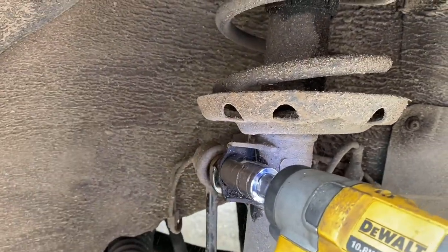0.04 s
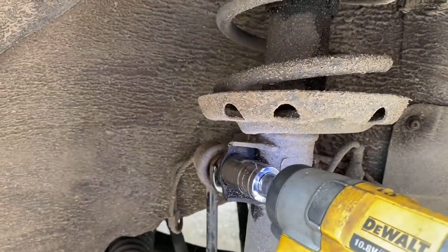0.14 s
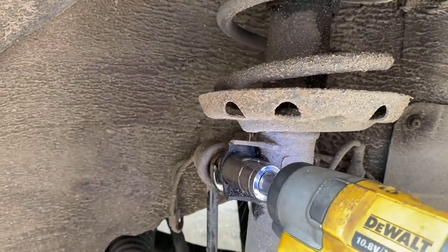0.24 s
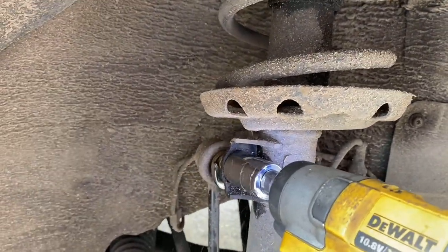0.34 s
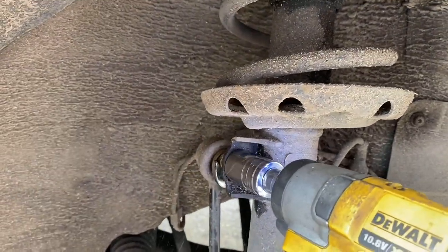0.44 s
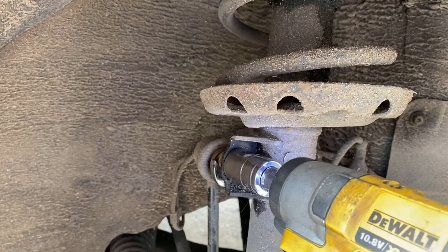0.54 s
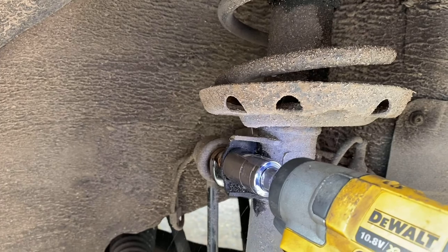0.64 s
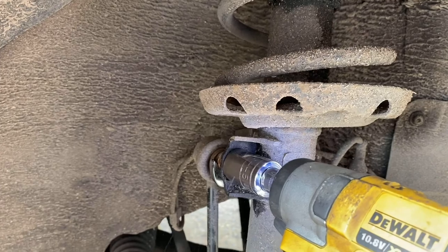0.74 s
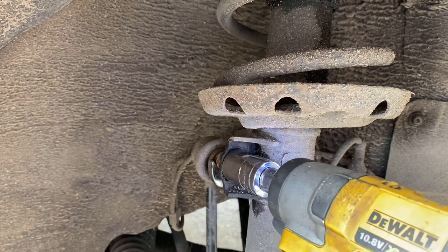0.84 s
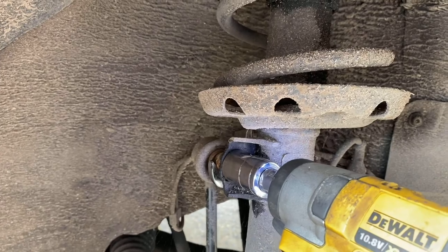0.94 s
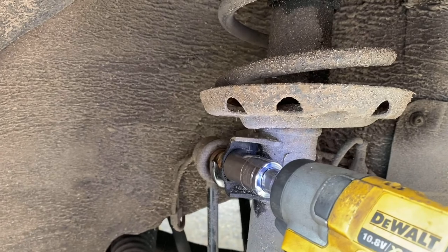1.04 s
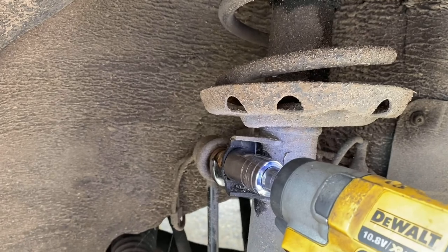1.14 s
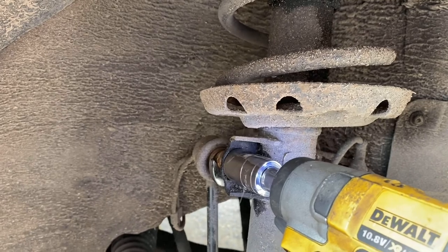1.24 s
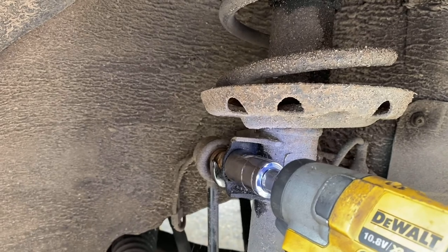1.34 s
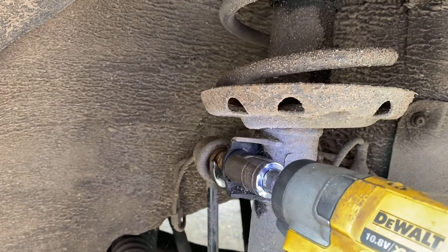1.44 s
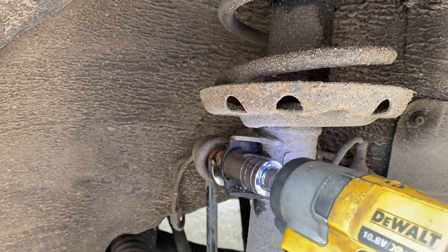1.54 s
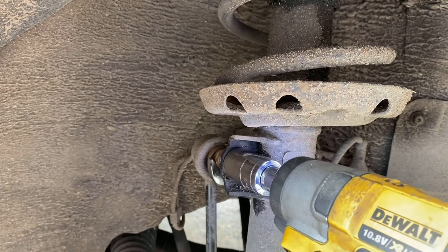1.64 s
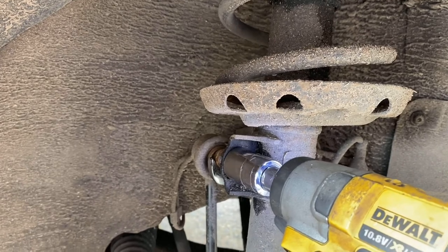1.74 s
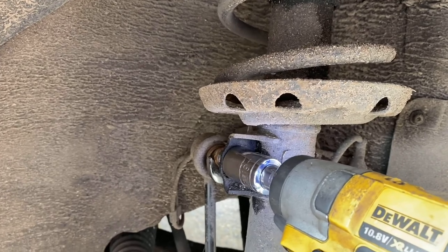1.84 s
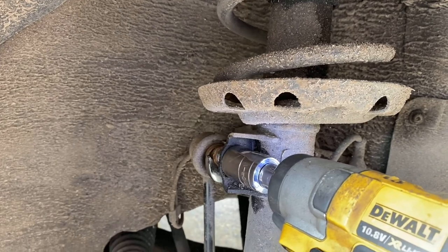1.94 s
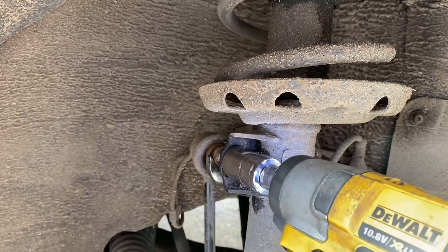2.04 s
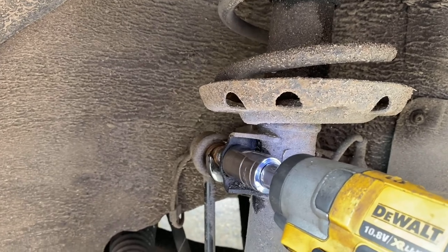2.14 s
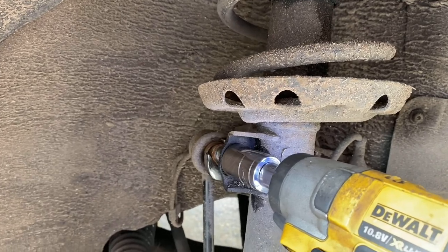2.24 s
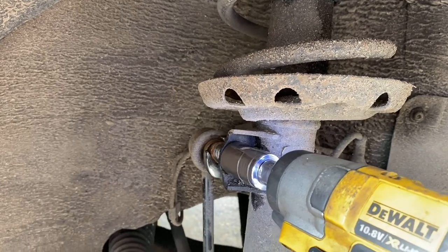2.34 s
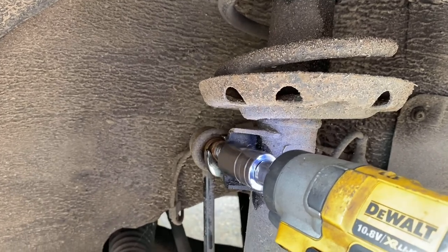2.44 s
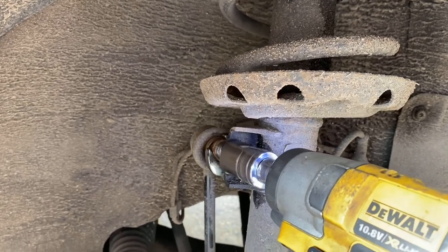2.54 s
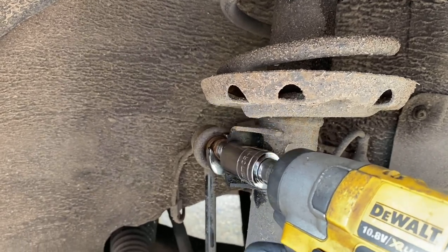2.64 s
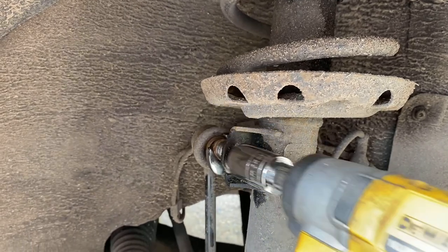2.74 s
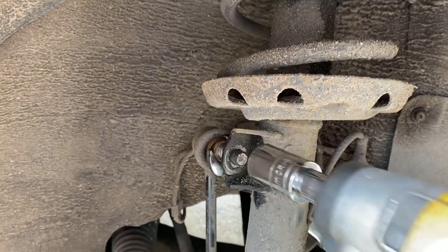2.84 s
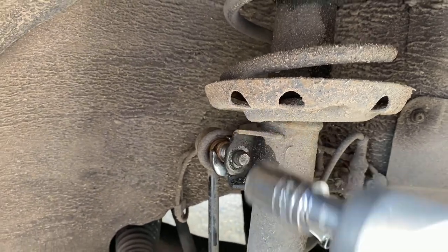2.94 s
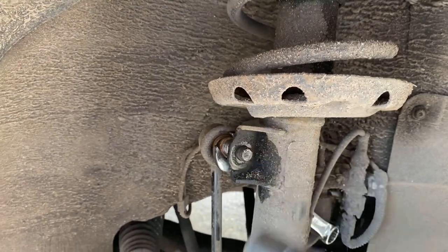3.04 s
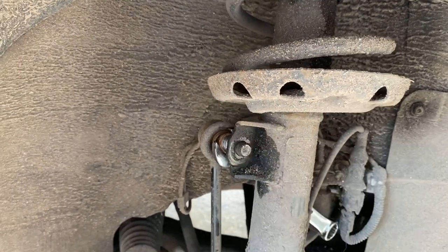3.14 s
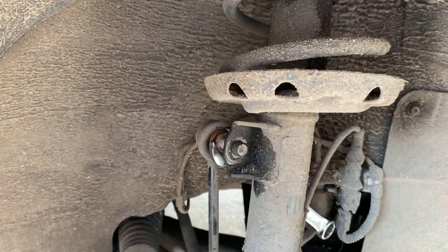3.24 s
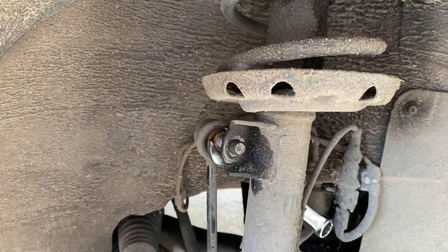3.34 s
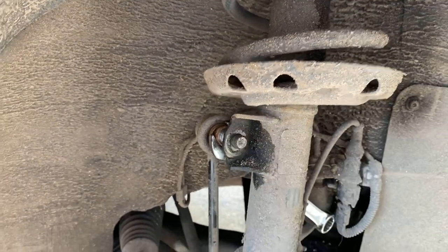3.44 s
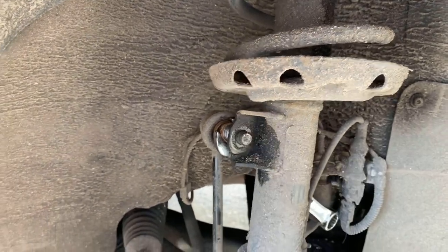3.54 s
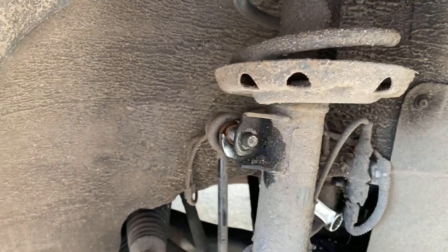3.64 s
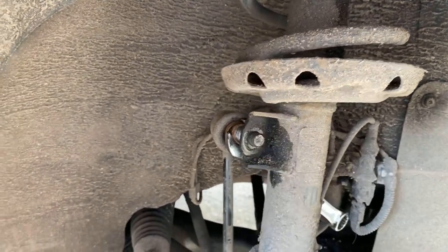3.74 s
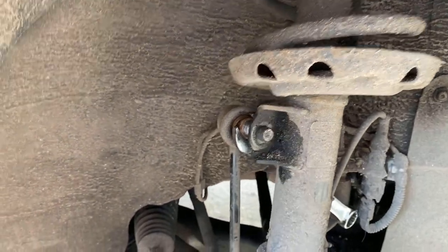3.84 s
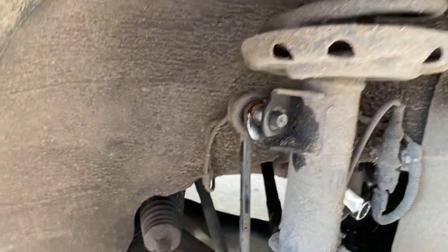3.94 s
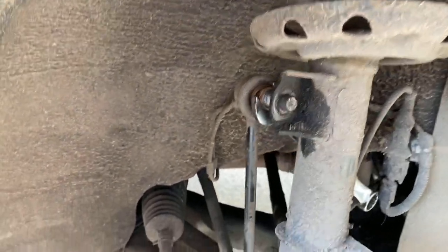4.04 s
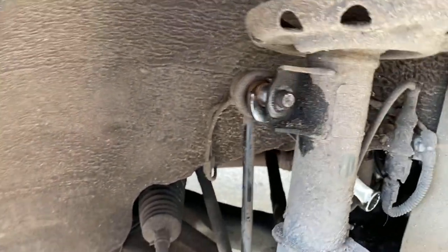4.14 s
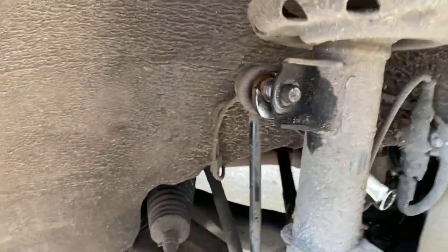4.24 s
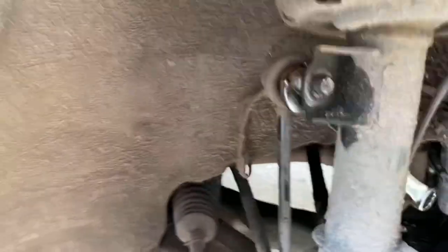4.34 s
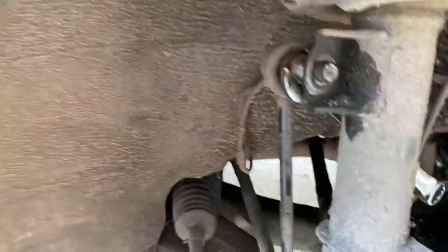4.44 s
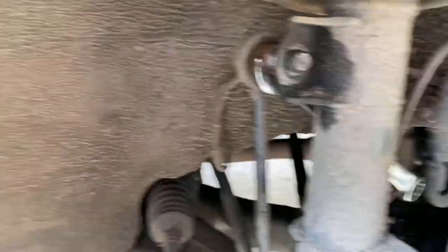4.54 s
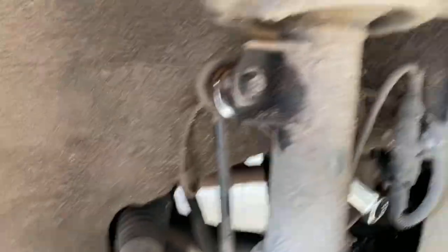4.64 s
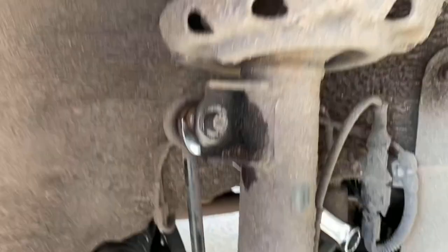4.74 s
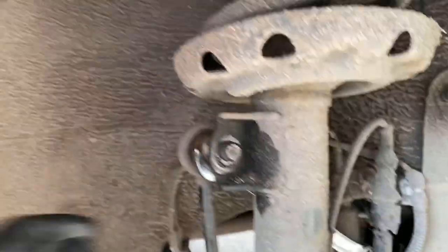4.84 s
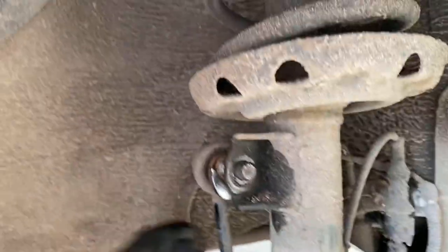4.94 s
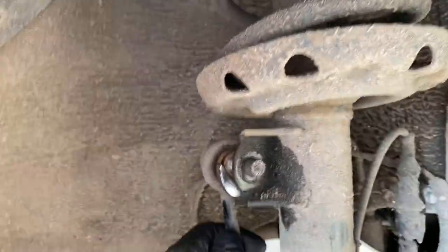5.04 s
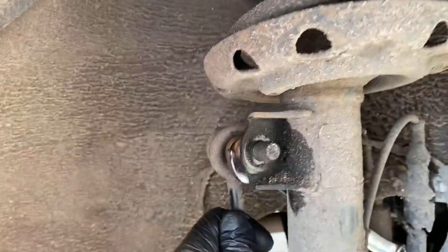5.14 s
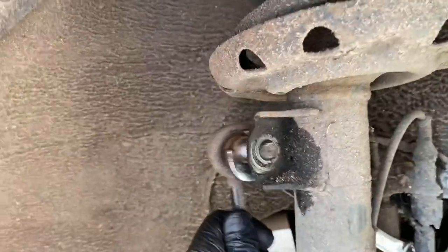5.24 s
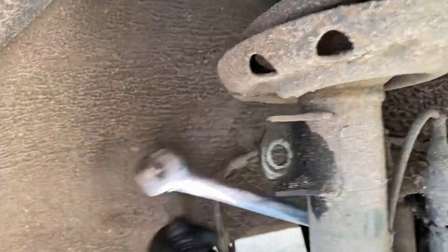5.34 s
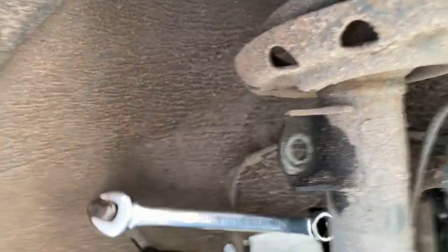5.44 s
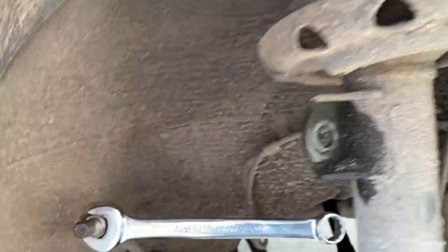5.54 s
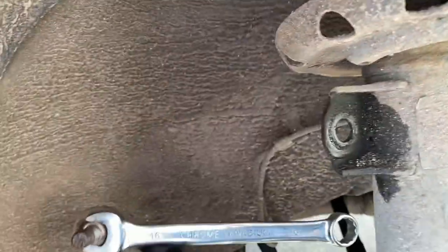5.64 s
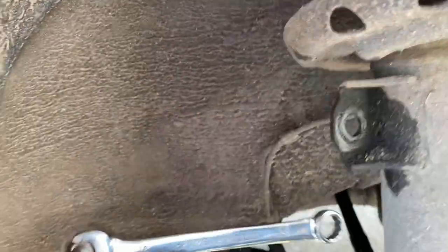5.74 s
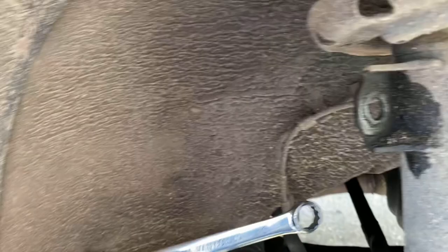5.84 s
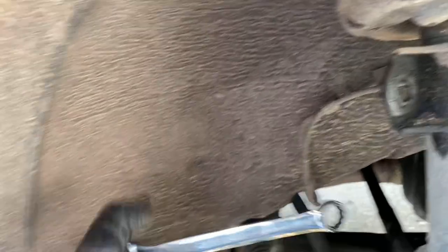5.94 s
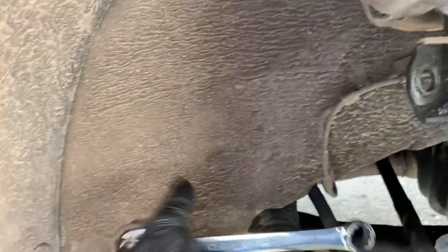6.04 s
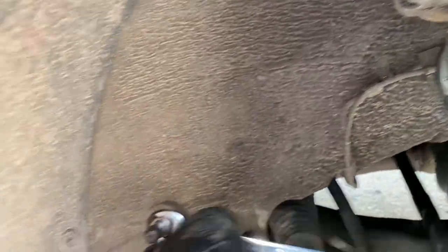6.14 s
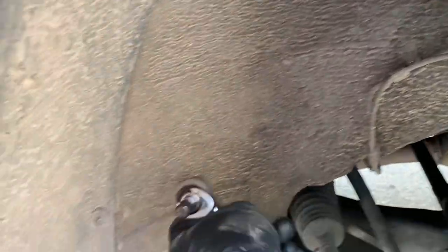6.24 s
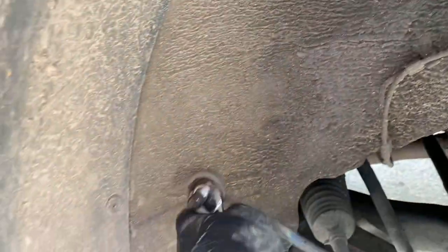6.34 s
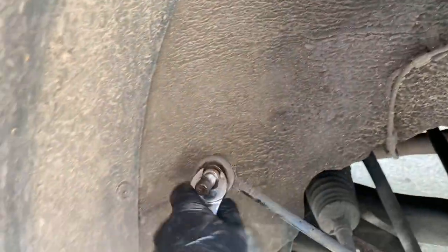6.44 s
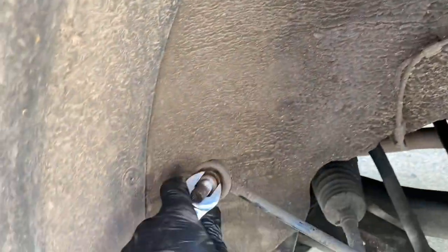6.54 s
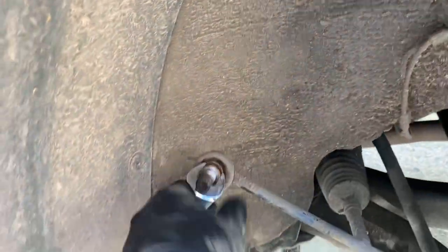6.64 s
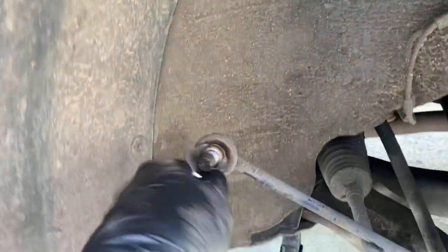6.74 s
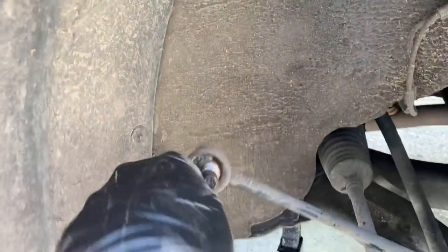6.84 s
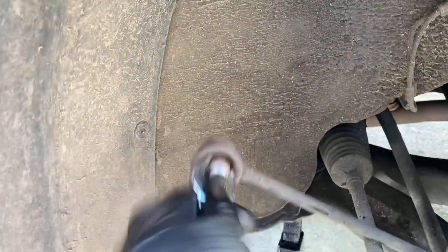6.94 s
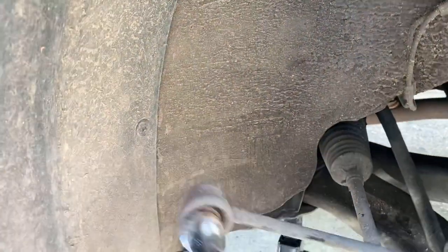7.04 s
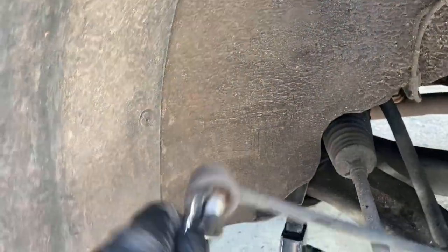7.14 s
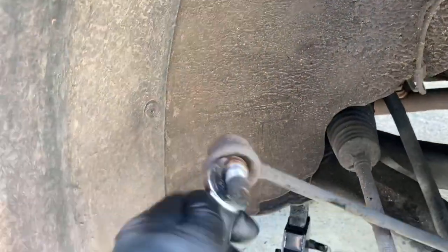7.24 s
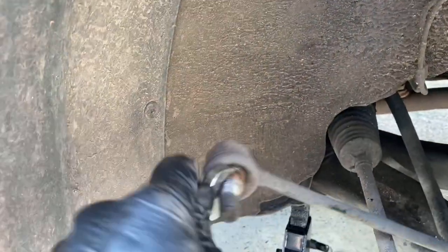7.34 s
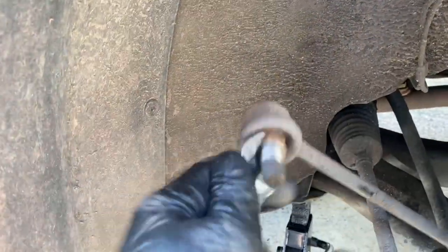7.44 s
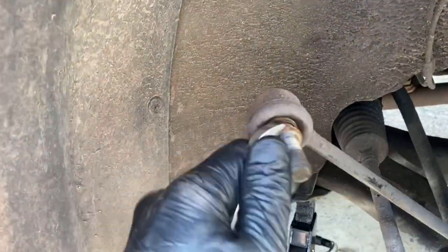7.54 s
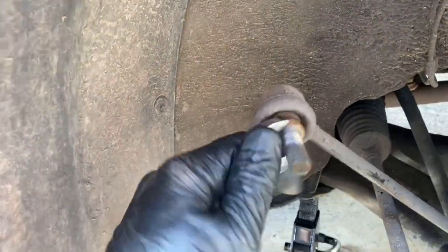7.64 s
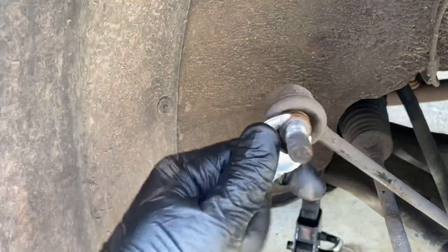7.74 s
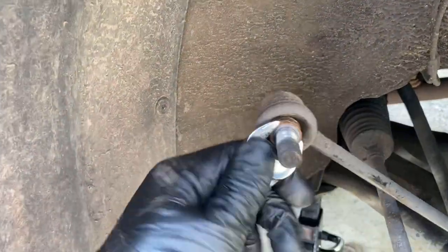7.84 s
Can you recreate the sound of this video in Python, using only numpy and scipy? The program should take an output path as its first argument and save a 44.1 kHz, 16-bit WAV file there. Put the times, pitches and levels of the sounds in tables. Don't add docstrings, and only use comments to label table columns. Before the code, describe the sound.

Very close and loud, a cordless impact wrench hammers a stuck nut, its fast, even metallic rattle ringing the steel over a motor whirr. It slows slightly, the gears whine briefly and it clicks to a stop. In the quiet that follows, a tool clanks down, a spanner snaps loose and scrapes, and a gloved hand bumps and rustles. Hand-held phone, close, in a calm yard or garage.

```python
import sys
import numpy as np
from scipy import signal
from scipy.fft import rfft, irfft, next_fast_len
from scipy.io import wavfile
from scipy.ndimage import uniform_filter1d, minimum_filter1d, map_coordinates

SR = 44100
rng = np.random.default_rng(int(sys.argv[2]) if len(sys.argv) > 2 else 0)


def to_wav(s):
    ch = np.atleast_2d(s).T
    pcm = np.round(np.clip(ch, -1, 1) * 32767)
    wavfile.write(sys.argv[1], SR, pcm.astype(np.int16))


def linear_from_db(decibels):
    return 10 ** (np.asarray(decibels, float) / 20)


N = 347508


def unit(x):
    return x / np.sqrt(np.mean(x ** 2) + 1e-20)


def along(points, hz):
    f, v = np.transpose(points)
    return np.interp(np.log(hz + 1), np.log(f + 1), v)


def curves(rows):
    s, *cols = np.transpose(rows)
    return [np.interp(np.arange(N) / SR, s, c) for c in cols]


def sounding(rows):
    t = np.arange(N) / SR
    return np.clip(np.minimum(t - rows[0][0], rows[-1][0] - t) * 100, 0, 1)


def swells(rows):
    t = np.arange(N) / SR
    gain = 0
    for s, db, rise, fall in rows:
        gain = gain + linear_from_db(db - rise * np.clip(s - t, 0, None) - fall * np.clip(t - s, 0, None))
    return gain


def wobble(rate):
    knots = rng.standard_normal(int(N * rate / SR) + 4)
    return map_coordinates(knots, [np.arange(N) * rate / SR])


def filtered(x, response):
    m = next_fast_len(N + SR // 2)
    return irfft(rfft(x, m) * response(np.fft.rfftfreq(m, 1 / SR)), m)[..., :N]


def hiss(spectrum, channels=2):
    return unit(filtered(rng.standard_normal((channels, N)), lambda hz: linear_from_db(along(spectrum, hz))))


def resonant(modes):
    def response(f):
        total = 0
        for k, (c, w, db) in enumerate(modes):
            total = total + (-1) ** k * linear_from_db(db) * 1j * f * w / (c * c - f * f + 1j * f * w)
        return total
    return response


def struck(times, sizes, t60, rise):
    t = np.arange(SR // 5) / SR
    hits = np.bincount(np.round(times * SR).astype(int), sizes, N)
    return signal.fftconvolve(hits, linear_from_db(-60 * t / t60) * (1 - np.exp(-t / rise)))[:N]


# f/Hz, likeness (1 = identical)
PORT_LIKENESS = [(200, .95), (600, .7), (1800, .5), (2300, .88), (4300, .65), (7400, .35), (8300, .97),
                 (9700, .78), (11000, .99), (12000, .8), (13000, .965), (13600, .992), (14300, .82),
                 (15700, .92)]
# f/Hz, level/dB
PORT_BALANCE = [(60, -1.5), (110, -0.5), (200, 0.5), (380, 6), (700, 5), (1290, 4), (2380, 0), (4400, 5.5),
                (8120, 1), (15000, 0)]
# f/Hz, phase/rad
PORT_LEAD = [(200, 0), (860, .3), (1700, -.6), (3200, 1.4), (5200, .5), (6100, -1.3), (7500, -1),
             (8100, -3.5), (8800, -3.9), (10300, -5.4), (11000, -6.28), (12000, -7.3), (13400, -9.42),
             (15700, -12.5)]


def at_ports(pair):
    sides = np.array([[1], [-1]])

    def turn(hz):
        return np.arccos(along(PORT_LIKENESS, hz)) / 2

    def arch(hz):
        return linear_from_db(sides * along(PORT_BALANCE, hz) / 2) * np.exp(.5j * sides * along(PORT_LEAD, hz))

    shared = filtered(pair[0], lambda hz: arch(hz) * np.cos(turn(hz)))
    return shared + filtered(pair[1], lambda hz: arch(hz) * sides * np.sin(turn(hz)))


# t/s, f/Hz, level/dB
FIRING = [(4.75, 66.2, -90.5), (4.86, 73.5, -84.5), (5.386, 80.34, -75), (5.79, 75.4, -88.5),
          (5.85, 75, -87)]
# multiple, level/dB
FIRING_ORDERS = [(2, -6), (3, 4.5), (4, -3), (5, -17), (7, -10.5)]
# t/s, f/Hz, level/dB
FAR_HUMS = [
    [(4.8, 391.5, -81.5), (5.276, 379.3, -72.5), (5.372, 405, -83), (5.8, 382, -74)],
    [(7.1, 374, -78), (7.206, 403, -76.5), (7.88, 386, -73)],
]
# t/s, f/Hz, level/dB
FAR_SQUEAL = [(7.7, 1500, -83), (7.79, 1470, -75), (7.82, 1477, -57.5), (7.84, 1460, -73.5),
              (7.88, 1435, -75)]
# t/s, f/Hz, level/dB
FAR_CHIRP = [(7.53, 4320, -97), (7.58, 4300, -90.5), (7.63, 4300, -93)]


def far_engine():
    hz, db = curves(FIRING)
    turn = 2 * np.pi * np.cumsum(hz) / SR
    orders = sum(linear_from_db(level + 2.5 * wobble(10)) * np.sin(k * turn) for k, level in FIRING_ORDERS)
    out = sounding(FIRING) * linear_from_db(db + 3) * orders
    for rows in [*FAR_HUMS, FAR_SQUEAL, FAR_CHIRP]:
        hz, db = curves(rows)
        phase = 2 * np.pi * np.cumsum(hz) / SR + .8 * wobble(130) * (hz / 400) ** .35
        out = out + sounding(rows) * linear_from_db(db + 3 + 3 * wobble(25)) * np.sin(phase)
    return out


# f/Hz, level/dB per Hz
RUMBLE_COLOUR = [(12, -59), (20, -41), (48, 1.5), (76, 1), (129, -6.5), (222, -16), (400, -33), (520, -66),
                 (880, -120)]
# f/Hz, level/dB per Hz
YARD_COLOUR = [(120, -43), (200, 3.5), (310, -5.5), (384, -3), (718, -10.5), (1140, -9), (1750, -14),
               (2050, -21), (4000, -31), (5200, -64), (8800, -120)]
# f/Hz, level/dB per Hz
RUSTLE_COLOUR = [(1000, -23), (2000, -6), (4000, -4.5), (7000, -1.5), (9000, -1), (12000, -9),
                 (15500, -3.5)]
# t/s, level/dB
GRIP_LEVEL = [(2.25, -70), (4.0, -68.5), (4.16, -80), (4.8, -78), (6.2, -101), (7.88, -64.5)]
# t/s, level/dB
YARD_LEVEL = [(2.6, -74), (2.67, -83.5), (4.64, -79), (5.08, -75.5), (6.56, -79), (7.88, -71)]
# t/s, level/dB
RUSTLE_LEVEL = [(2.7, -92), (3.35, -82.5), (3.44, -88), (5.53, -89.5), (5.74, -82.5), (6.52, -88),
                (7.73, -84), (7.88, -75)]
# t/s, level/dB, half length/s
GLOVE_STROKES = [(4.777, -84, 0.029), (5.011, -80, 0.031), (5.452, -85, 0.029), (5.552, -79, 0.032),
                 (5.659, -73.5, 0.054), (5.773, -76, 0.023), (5.874, -74, 0.035), (5.978, -80, 0.019),
                 (6.08, -78, 0.027), (6.199, -79, 0.025), (6.267, -84, 0.034), (6.325, -84, .01),
                 (6.915, -84, 0.013), (6.964, -75, 0.035), (7.127, -74, 0.022), (7.353, -81, 0.016),
                 (7.814, -76, 0.023)]
# peak t/s, level/dB, rise/(dB/s), fall/(dB/s)
HAND_SHIFTS = [(2.25, -39, 2003, 564), (2.95, -56, 99, 77.5), (4.84, -66, 56, 299.5), (5.25, -63.5, 29, 94),
               (5.5, -56, 138, 243.5), (5.89, -57, 54, 29), (6.24, -52, 2000, 29), (6.77, -47, 203, 37.5)]


def hand():
    a, b = hiss(RUMBLE_COLOUR)
    rumble = unit(linear_from_db(3.22 * wobble(25)) * np.array([a + 0.27 * b, a - 0.27 * b]))
    rustle = at_ports(unit(linear_from_db(1.6 * wobble(6.9) + 2.2 * wobble(150)) * hiss(RUSTLE_COLOUR)))
    t = np.arange(N) / SR
    strokes = sum(linear_from_db(db) * np.exp(-((t - s) / half) ** 2) for s, db, half in GLOVE_STROKES)
    out = strokes * rustle + swells(HAND_SHIFTS) * rumble
    layers = [(GRIP_LEVEL, rumble, .3), (RUSTLE_LEVEL, rustle, 1.5), (YARD_LEVEL, hiss(YARD_COLOUR), 1.5)]
    for rows, noise, db in layers:
        out = out + sounding(rows) * linear_from_db(curves(rows)[0] + db) * noise
    return out


# peak t/s, level/dB, rise/(dB/s), fall/(dB/s)
DRAGS = [
    (4.6, -68.5, 580, 178),
    (5.08, -57.5, 450, 602),
    (5.209, -50, 9000, 415),
    (5.226, -43.5, 1600, 637),
]
# f/Hz, width/Hz, level/dB
SPANNER_MODES = [(1545, 38, 1), (3430, 88, 1), (4100, 110, -2.5), (5000, 150, -2), (6080, 180, -2),
                 (7000, 120, -9), (7700, 110, -9), (8960, 540, -15)]
# f/Hz, level/dB per Hz
CONTACT_BODY = [(300, -25), (900, 5), (2000, 0.5), (4000, 0), (7000, -11.5), (16000, -49)]
# f/Hz, level/dB per Hz
CONTACT_TREBLE = [(2000, -52), (4500, -5.5), (7000, 0.5), (10000, 0.5), (15500, -4)]
# t/s, level/dB
GLOVE_SQUEAK = [(7.65, -95), (7.675, -68), (7.72, -66), (7.75, -74), (7.77, -95)]
# f/Hz, level/dB per Hz
RUBBER_COLOUR = [(4000, -30.5), (6000, -21.5), (6600, -17), (7500, -10), (8500, -25), (11000, -48)]


def scrapes():
    grit = rng.standard_normal((2, N)) * linear_from_db(2.4 * wobble(300))
    ringing = unit(filtered(grit, resonant(SPANNER_MODES)))
    drag = unit(linear_from_db(5.5) * ringing + hiss(CONTACT_BODY) + linear_from_db(-16) * hiss(CONTACT_TREBLE))
    squeak = linear_from_db(curves(GLOVE_SQUEAK)[0] + 2.0 * wobble(80)) * hiss(RUBBER_COLOUR)
    return swells(DRAGS) * at_ports(drag) + sounding(GLOVE_SQUEAK) * squeak


# t/s, peak level/dB, strongest ring f/Hz, relative treble level/dB
CLANKS = [(2.583, -35.5, 3660, 9), (2.584, -30, 4700, -8), (2.584, -36, 2200, -35),
          (3.7025, -28, 1230, -12.5), (3.704, -29.5, 2910, -26), (3.757, -36.5, 1580, -7),
          (3.756, -40, 3040, -28), (3.78, -26.5, 795, -15), (3.781, -30, 2940, -27),
          (3.783, -28.5, 1250, -27), (3.815, -49, 2198, -30), (5.207, -43, 3415, -3),
          (6.751, -44, 2960, -26), (6.752, -63, 2470, -35), (6.752, -61, 2000, -30)]
TICKS = [(3.249, -63, 772, -12), (3.284, -62, 1327, -14.5), (3.337, -60, 2230, -22),
         (3.859, -52.5, 3320, -14), (3.885, -49.5, 4540, -21), (4.027, -57, 2006, -15),
         (4.065, -55, 1530, -31), (4.1, -68, 5000, -7), (4.125, -59, 4320, -17), (4.154, -57, 720, -19),
         (4.056, -47, 8370, -37), (4.346, -72, 5200, -19), (4.359, -62, 1150, -20), (5.077, -39, 910, -28),
         (6.948, -62.5, 1130, -12), (7.387, -58, 2600, -36), (7.401, -60, 1380, -36),
         (7.76, -64.5, 2500, -30), (7.632, -66, 2790, -24)]
BUMPS = [(2.659, -63.5, 1153, -14), (4.052, -53, 639, -21), (5.036, -51.5, 920, -19),
         (5.222, -44, 1530, -27), (5.846, -47.5, 886, -47), (6.236, -46.5, 900, -25),
         (6.24, -61, 2070, -36), (6.25, -63.5, 1402, -43), (6.527, -52, 910, -57), (6.573, -61, 2600, -25),
         (6.609, -58, 2630, -21), (6.859, -79, 960, -3), (6.995, -43.5, 903, -57),
         (7.003, -51.5, 1302, -38), (7.259, -62, 703, -13), (7.499, -70, 803, 5),
         (7.783, -53.5, 400, -40.5), (7.812, -51, 884, -26)]
SNAPS = [
    (4.583, -60, 6500, -11),
    (4.6135, -32, 4400, -36),
    (4.641, -33.5, 5390, -37),
    (4.6425, -34, 2390, -27),
    (4.687, -57, 4300, -22),
]
SNAP_T60_S = 0.007
# rows, relative dull knock level/dB, t60/s, after-ring level/dB
CONTACTS = [
    (CLANKS, -32.5, 0.029, -21),
    (SNAPS, -35, SNAP_T60_S, -27),
    (TICKS, -27, 0.045, -11),
    (BUMPS, -1.7, 0.068, -16),
]


def knocks():
    out, t = np.zeros((2, N)), np.arange(SR // 4) / SR
    body, sharp = at_ports(hiss(CONTACT_BODY)), at_ports(hiss(CONTACT_TREBLE))
    dull = hiss([(80, -27), (200, 1.5), (450, -8), (900, -18.0), (2000, -77)], channels=1)
    rough = hiss([(10, 7), (100, -9.5), (400, -38), (2000, -92)])
    events = [(*row, *kind) for rows, *kind in CONTACTS for row in rows]
    for s, db, hz, treble_db, knock_db, t60, tail_db in events:
        start = round(s * SR)
        at = slice(start, min(start + len(t), N))
        u, t60 = t[:at.stop - at.start], np.clip(t60, .005, .2)
        fade = linear_from_db(-60 * u / t60) * (1 - np.exp(-u / (0.032 * t60)))
        tail = linear_from_db(tail_db - 60 * u / 0.206)
        partials = [(1, 0.8), (1.6, .5 * treble_db), (2.3, 4.5 + .7 * treble_db)]
        modes = sum(linear_from_db(level) * np.sin(2 * np.pi * k * hz * u) for k, level in partials)
        ring_t60 = np.clip(.75 * t60 * (1500 / hz) ** .4, .008, .034)
        ring_fade = linear_from_db(-60 * u / ring_t60) * (1 - np.exp(-u / 0.00029))
        ring = linear_from_db(-12.5 - 0.15 * treble_db) * modes * (1 + 1.1 * rough[:, at]) * ring_fade
        burst = linear_from_db(-5.5 + 0.44 * min(treble_db, -6)) * body[:, at]
        burst = burst + linear_from_db(treble_db + 3.0 - 60 * u / 0.17) * sharp[:, at]
        thud = linear_from_db(knock_db - 6.0) * dull[:, at] * linear_from_db(-60 * u / 0.19) * (1 - np.exp(-u / 0.0011))
        out[:, at] += linear_from_db(db) * (burst * (fade + tail) + ring + thud)
    return out


# t/s, level/dB
MOTOR_LEVEL = [(0, -36), (1.9, -36.5), (2.2, -36.5), (2.3, -44.5), (2.37, -43.5), (2.39, -40),
               (2.415, -40.5), (2.432, -37.5), (2.445, -40.5), (2.457, -37), (2.478, -44.5), (2.515, -40),
               (2.535, -44.5), (2.58, -41), (2.615, -55), (2.645, -99)]
# f/Hz, level/dB per Hz
WHIRR_COLOUR = [(60, -31.5), (150, 2.5), (300, -10.5), (550, -12), (900, -1.5), (3000, -4), (3700, -3.5),
                (5000, 1), (6200, -3), (8600, 0.5), (12000, -1), (15500, -2.5)]
# f/Hz, width/Hz, level/dB
CASE_MODES = [(960, 55, -8.5), (1700, 80, -3.5), (1974, 35, -2), (2190, 89, -5.5), (3575, 45, 1),
              (5580, 40, -8.5)]


def motor():
    case = unit(filtered(rng.standard_normal((2, N)), resonant(CASE_MODES)))
    level_db, = curves(MOTOR_LEVEL)
    case_gain = linear_from_db(-7.5 + 0.72 * (level_db + 39))
    whirr = (hiss(WHIRR_COLOUR) + case_gain * case) * linear_from_db(1.5 * wobble(60))
    return at_ports(whirr) * linear_from_db(level_db) * (np.arange(N) < MOTOR_LEVEL[-1][0] * SR)


# t/s, f/Hz, level/dB
GEAR_MESH = [(2.25, 4600, -70), (2.29, 4720, -63), (2.32, 4900, -66.5), (2.35, 4940, -58.5),
             (2.38, 5000, -61), (2.44, 4940, -51), (2.47, 4920, -64), (2.52, 4900, -65), (2.56, 4850, -65)]
# multiple, level/dB
MESH_ORDERS = [(.67, -1), (1, 0), (1.055, -3), (2.02, -8), (3.04, -11)]


def whine():
    hz, db = curves(GEAR_MESH)
    turn = 2 * np.pi * np.cumsum(hz) / SR

    def line(k, level):
        return linear_from_db(level + 3 * wobble(40)) * np.sin(k * turn + .9 * wobble(90))

    lines = [sum(line(k, level) for k, level in MESH_ORDERS) for _ in range(2)]
    return at_ports(sounding(GEAR_MESH) * linear_from_db(db + 5.5) * np.array(lines))


# t/s, peak level/dB, jolt
# level/dB, favoured ring f/Hz
HAMMER_BLOWS = [(0.0, -16.5, -28.5, 5000), (0.0172, -12, -15.5, 1980), (0.0385, -8, -27, 2266),
                (0.0576, -9, -28, 3780), (0.0785, -10.0, -31, 1138), (0.0987, -11.5, -18, 1575),
                (0.1194, -8.5, -33.5, 2996), (0.139, -10.5, -29, 1575), (0.1586, -9.5, -37, 3817),
                (0.1785, -11.5, -20.5, 2575), (0.1982, -9.5, -28, 3020), (0.2181, -11.5, -23, 1390),
                (0.2378, -11.5, -28, 4580), (0.2581, -10, -20.5, 1386), (0.2776, -11.5, -20.5, 1385),
                (0.2984, -12.5, -24.5, 1980), (0.3183, -11.5, -23, 5000), (0.339, -12.0, -27.5, 3003),
                (0.3591, -10, -31, 3290), (0.3789, -9, -26.5, 5000), (0.3993, -9.5, -37.5, 3776),
                (0.4192, -10, -28.5, 3815), (0.4398, -12, -40, 3000), (0.46, -13, -34, 4570),
                (0.4795, -11.5, -31, 4570), (0.4996, -10, -23.5, 1138), (0.5198, -11.5, -35, 1378),
                (0.539, -11.5, -24.5, 2266), (0.5582, -11, -25.5, 1367), (0.5792, -11.5, -23.5, 1575),
                (0.599, -10, -19, 5000), (0.6196, -11.5, -10.5, 926), (0.639, -11, -12.5, 6200),
                (0.6589, -12.5, -31, 6200), (0.6795, -9.5, -26, 3800), (0.6991, -12, -21.5, 4540),
                (0.7188, -7.5, -23.5, 1138), (0.7383, -11.5, -30.5, 5000),
                (0.757, -10, -39, 2266), (0.778, -10.5, -38.5, 3290), (0.7962, -10.5, -18.5, 3800),
          (0.817, -11.5, -36.5, 2575), (0.8369, -10.5, -26, 3000), (0.8574, -12, -30.5, 1575),
          (0.8759, -10.5, -38, 3800), (0.8968, -11, -37.5, 1380), (0.9151, -10.5, -20.5, 1380),
          (0.935, -8.5, -26.5, 926), (0.9548, -13.5, -23.5, 1370), (0.9742, -13, -23.5, 3800),
          (0.9937, -11.0, -36.5, 6200), (1.0136, -9.5, -31.5, 3800), (1.0325, -10, -17.5, 1138),
          (1.052, -10.5, -28.5, 3800), (1.0716, -10.0, -16.5, 3800), (1.0912, -12, -31.5, 4590),
          (1.111, -10.5, -22, 1390), (1.1299, -10, -20.5, 3800), (1.1493, -11.5, -26, 1575),
          (1.1693, -10, -34.5, 2575), (1.1896, -10.5, -33, 3800), (1.2086, -11, -28, 2575),
          (1.2271, -11, -22.5, 3800), (1.248, -12, -30, 6200), (1.266, -10.5, -32.5, 2266),
          (1.286, -10, -27.5, 2266), (1.3054, -10.5, -23.5, 3800), (1.3245, -12.0, -33.5, 1380),
          (1.3439, -14, -35.5, 2575), (1.3634, -13.5, -26, 2575), (1.3837, -13.5, -36, 3800),
          (1.4038, -12, -35.5, 3800), (1.423, -14, -44.5, 2266), (1.4426, -12, -32.5, 1980),
          (1.462, -10, -27.5, 1980), (1.481, -13, -38.5, 3800),
                (1.5, -11.5, -22.5, 1575), (1.5189, -13, -28.5, 3800), (1.5396, -10, -28, 3800),
         (1.558, -13, -34.5, 2575), (1.5778, -11.5, -32, 3800), (1.597, -11, -33.5, 2575),
         (1.6163, -11.5, -22, 3290), (1.6356, -12, -31, 1138), (1.6551, -13.5, -25, 3800),
         (1.6749, -13, -29, 926), (1.6943, -12.5, -23, 3800), (1.7135, -14, -34.5, 2266),
         (1.7337, -13.5, -27, 6200), (1.754, -13, -38, 4570), (1.7738, -11, -33.5, 3800),
         (1.7928, -9.5, -26.5, 3000), (1.8131, -10.5, -40, 2266), (1.8343, -10.5, -32, 5000),
         (1.8535, -12.5, -32, 1380), (1.8731, -8, -24.5, 3800), (1.893, -13, -35, 1380),
         (1.9118, -9, -32, 3800), (1.9315, -10, -26, 3000), (1.9515, -10, -32, 2575),
         (1.9709, -12.5, -35, 1380), (1.992, -11, -31.5, 3800), (2.014, -10, -29.5, 6200),
         (2.0371, -14, -36.5, 4570), (2.0604, -9.5, -37.5, 2575), (2.0823, -11, -23.5, 3800),
         (2.1025, -12, -34.5, 6200), (2.1232, -12, -26.5, 2575), (2.1455, -12, -36, 3800),
         (2.1711, -9.5, -23.5, 6200), (2.2025, -10.5, -39.5, 3800), (2.227, -11, -30.5, 3800)]


def blows():
    return np.transpose(HAMMER_BLOWS)


# t/s, level/dB
PHONE_BUMPS = [
    (4.597, -57.5),
    (4.806, -62),
    (5.471, -63.5),
    (6.239, -54),
]
# f/Hz, level/dB per Hz
JOLT_COLOUR = [(20, -39), (45, -1), (75, 1.5), (250, -2), (500, -8), (1200, -24.5), (3000, -50)]


def push(beat, turns=1.3):
    s, db = np.c_[np.transpose(PHONE_BUMPS), beat[[0, 2]]]
    sizes = np.sign(rng.standard_normal(len(s))) * linear_from_db(db + 39.5)
    hits = np.bincount(np.round(s * SR).astype(int), sizes, N)

    def response(f):
        return linear_from_db(along(JOLT_COLOUR, f)) * np.exp(-2j * np.pi * turns * np.log(f + 1))

    return filtered(hits, response) * linear_from_db(2.5 * wobble(30) * np.array([[1], [-1]]))


# f/Hz, width/Hz, level/dB
STRUT_MODES = [(926, 34, -5), (1138, 23, -4), (1388, 60, -2.5), (1575, 35, -4.5), (1980, 58, -6.5),
               (2266, 74, -2.5), (2575, 62, -1), (3000, 72, -3), (3290, 63, -2.5), (3800, 105, -1),
               (4580, 140, -2.5), (5000, 70, -3.5), (6180, 110, -5), (8620, 500, 0)]


def strut(times, sizes, favoured_hz):
    favour_db, favour_share, scatter_db = 7, 0.04, 3
    hz, width, db = np.transpose(STRUT_MODES)[:, :, None]
    t = np.arange(4096) / SR
    modes = width / 60 * linear_from_db(db) * np.exp((2j * hz - width) * np.pi * t) * (1 - np.exp(-t / 0.0003))
    near = np.exp(-(np.log(hz.T / favoured_hz[:, None]) / favour_share) ** 2)
    luck = rng.standard_normal((len(times), 2, 2, len(STRUT_MODES))).transpose(1, 2, 0, 3)
    mix = sizes[:, None] * linear_from_db(favour_db * near + scatter_db * luck[0]) * np.exp(3j * luck[1])
    at = (np.round(times * SR).astype(int)[:, None] + np.arange(len(t))).ravel()
    return np.array([np.bincount(at, (part @ modes).real.ravel(), N) for part in mix])


# f/Hz, level/dB per Hz
RATTLE_COLOUR = [(240, -12.5), (400, -15), (740, -12.5), (1360, -6.5), (2600, -10.5), (3800, -7),
                 (6000, -7), (8200, -4.5), (12000, -8.5), (15500, -5.5)]
# f/Hz, t60/s
RATTLE_T60 = [(500, 0.069), (3000, 0.063), (12000, 0.03)]


def hammer(beat):
    s, db, _, favoured_hz = beat
    luck = rng.standard_normal((len(s), 5))
    times = np.r_[s, s + .0025 + .0008 * luck[:, 0], s + .0075 + .001 * luck[:, 3]]
    sizes = np.r_[linear_from_db(db), linear_from_db(db - 6 + 4 * luck[:, 1]), linear_from_db(db - 16 + 4 * luck[:, 2])]
    noise = hiss(RATTLE_COLOUR)
    crack_sizes = sizes * np.tile(linear_from_db(2.8 * luck[:, 4]), 3)
    rattle = linear_from_db(6) * noise * struck(times, crack_sizes, 0.008, rise=.0004)
    for (_, t60), share in zip(RATTLE_T60, np.eye(3)):
        weights = [(c[0], u) for c, u in zip(RATTLE_T60, share)]
        band = filtered(noise, lambda f: along(weights, f))
        rattle = rattle + band * struck(times, sizes, t60, rise=0.0004)
    ring = strut(times, sizes, np.tile(favoured_hz, 3))
    return at_ports(linear_from_db(-11.0) * rattle + linear_from_db(-18) * ring)


# from t/s, to t/s
CALM_SPANS = [(.365, .435), (1.3, 1.38), (1.51, 1.71), (1.785, 1.85), (1.9, 1.945)]


def restless():
    t = np.arange(N) / SR
    return 1 - sum((t > a) & (t < b) for a, b in CALM_SPANS)


def band_limited(x):
    top_hz, burst_top_hz = 16065, 16600

    def below(edge_hz):
        def response(hz):
            return linear_from_db(-60 / (1 + np.exp(np.clip((edge_hz - hz) / 40, -50, 50))))
        return filtered(x, response)

    low = below(top_hz)
    extra = below(burst_top_hz) - low
    level = uniform_filter1d(np.abs(extra).sum(axis=0), size=128)
    nearby_peak = -minimum_filter1d(-level, size=900)
    attack = (level > linear_from_db(-5) * nearby_peak) & (level > linear_from_db(-47))
    return low + extra * uniform_filter1d(attack * restless() * 1., size=64)


def masked(x, depth_db=-17, low_hz=4500, under_db=-11):
    hz, _, both = signal.stft(np.array([x[0] + x[1], x[0] - x[1]]) / 2, SR, nperseg=256)
    bass = hz[:, None] < low_hz
    bands = np.abs(both[:, 1:]).reshape(2, 32, -1, both.shape[2]).mean(axis=2)
    bands = bands * linear_from_db(2 * rng.standard_normal(bands.shape))
    level = np.repeat(bands, 4, axis=1)[:, np.r_[0, :128]]
    depth = np.resize((linear_from_db(depth_db + 1.5 * wobble(40)) * restless())[::128], both.shape[2])
    spread = uniform_filter1d(level.max(axis=0), size=41, axis=0)
    loudest = -minimum_filter1d(-spread, size=9, axis=1)
    keep = (level > depth * loudest) | bass | (loudest < linear_from_db(-62))
    slow = uniform_filter1d(uniform_filter1d(np.abs(both), size=3, axis=1), size=7, axis=2)
    keep[0] &= (slow[0] > linear_from_db(under_db) * slow[1]) | bass | (level[0] > linear_from_db(-50))
    mid, side = both * keep
    return signal.istft(np.array([mid + side, mid - side]), SR, nperseg=256)[1][:, :N]


def scene():
    beat = blows()
    background = far_engine() + hand() + scrapes() + knocks()
    return background + motor() + whine() + push(beat) + hammer(beat)


def band_limit(x):
    return signal.sosfilt(signal.butter(12, 17120, fs=SR, output="sos"), x)


def record(dry):
    saturated = dry / (1 + np.abs(dry / .8) ** 6) ** (1 / 6)
    mix = masked(band_limited(saturated))
    return band_limit(mix)


dry = scene()
out = record(dry)
to_wav(out)
```